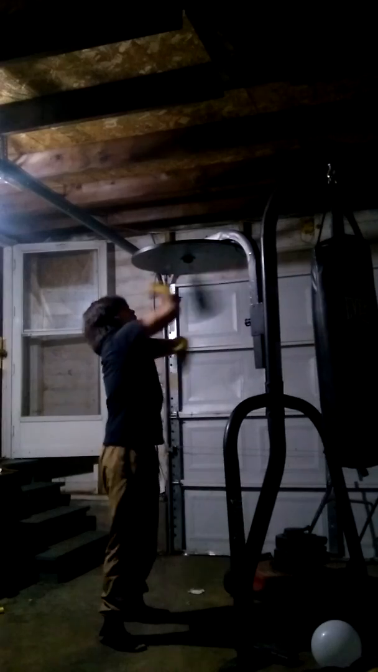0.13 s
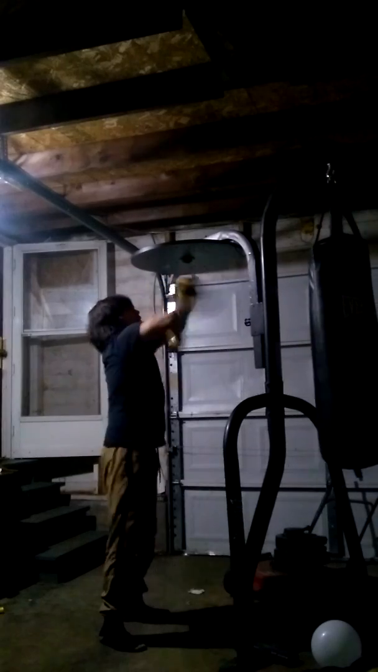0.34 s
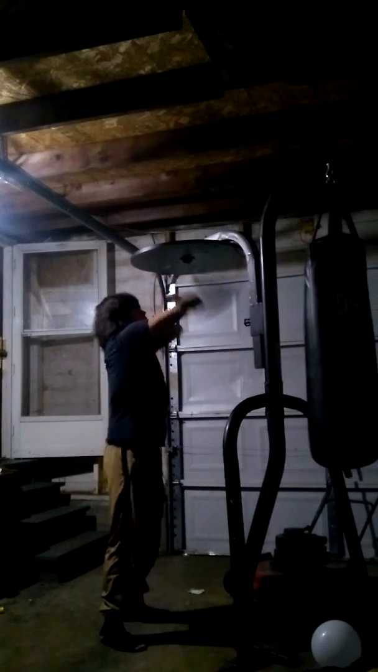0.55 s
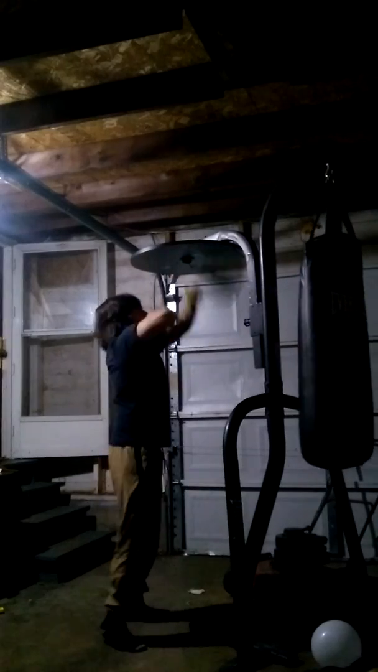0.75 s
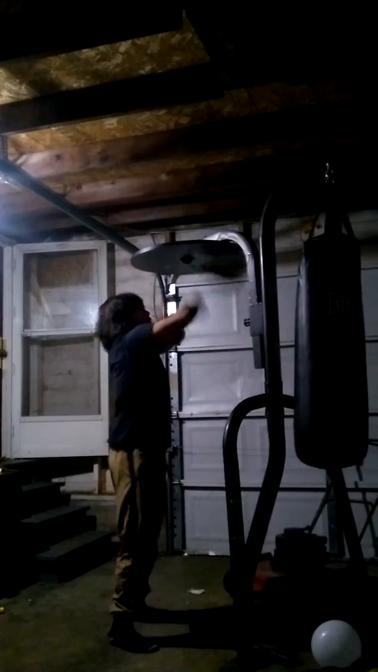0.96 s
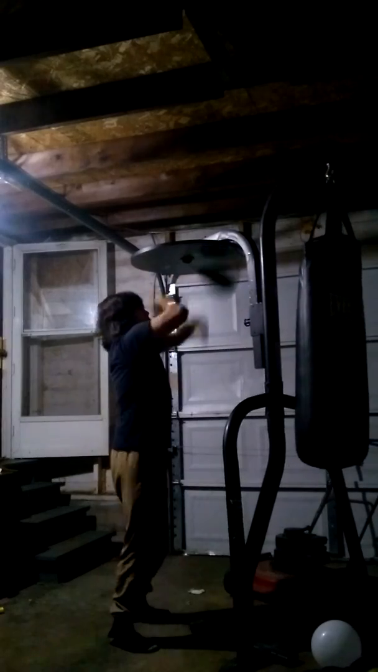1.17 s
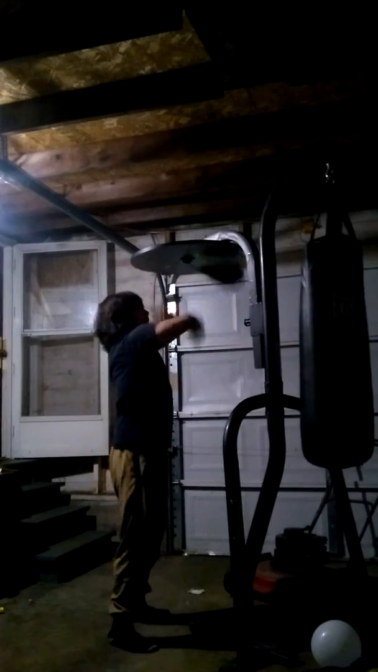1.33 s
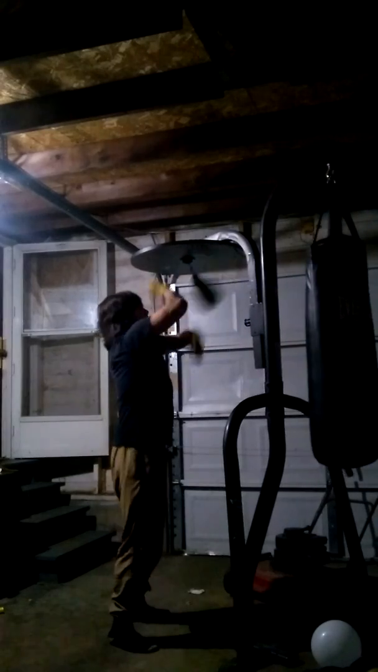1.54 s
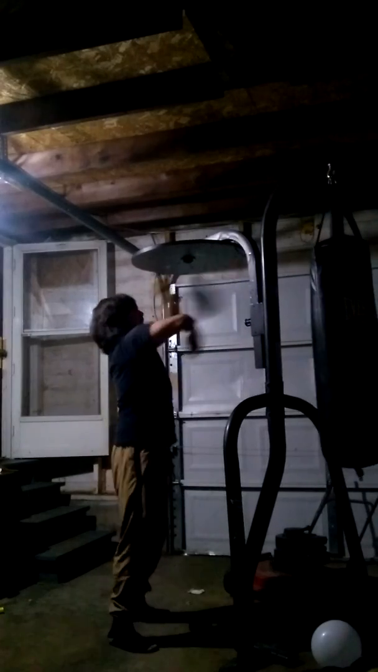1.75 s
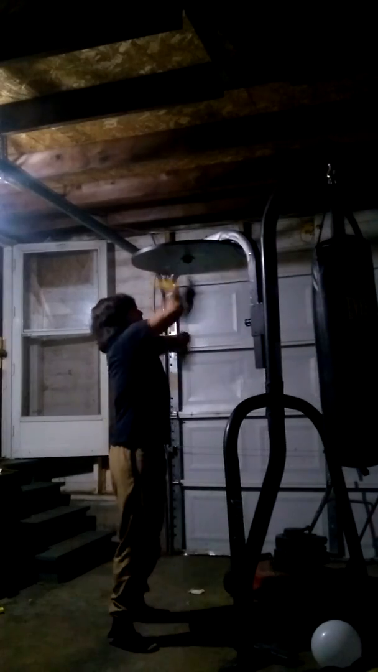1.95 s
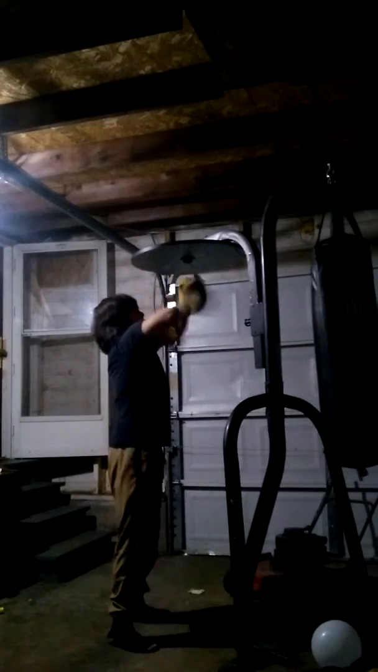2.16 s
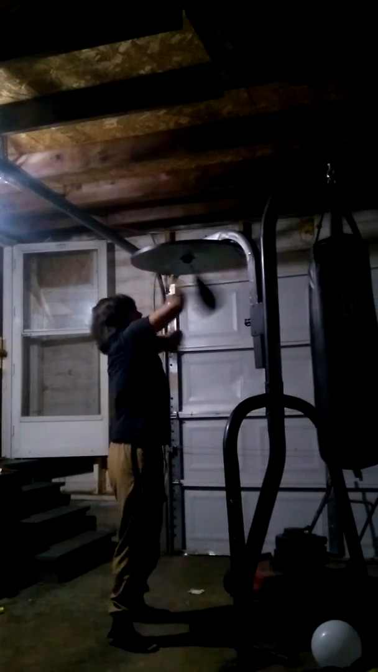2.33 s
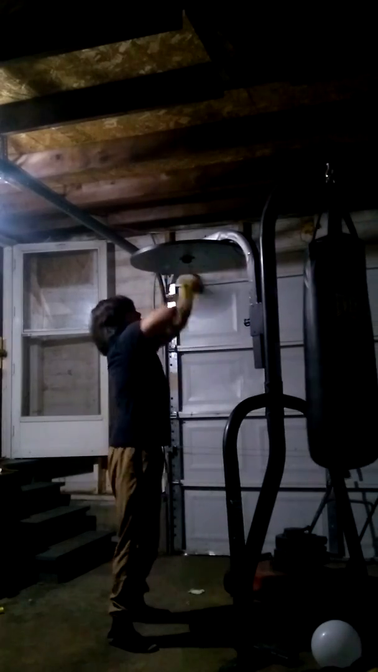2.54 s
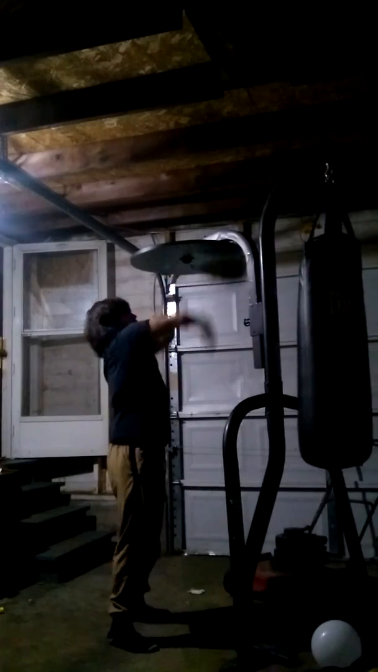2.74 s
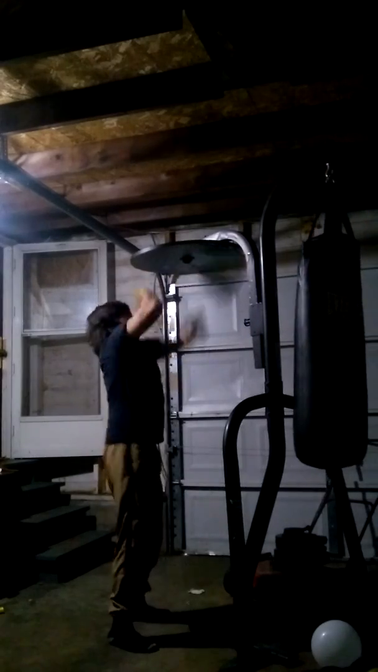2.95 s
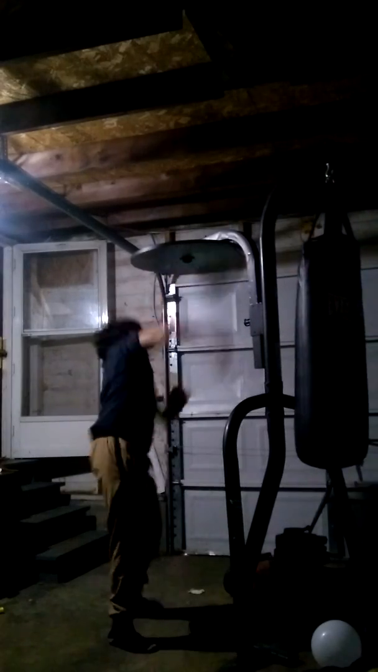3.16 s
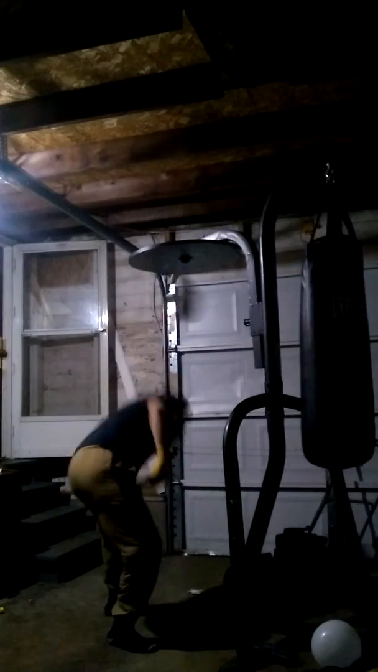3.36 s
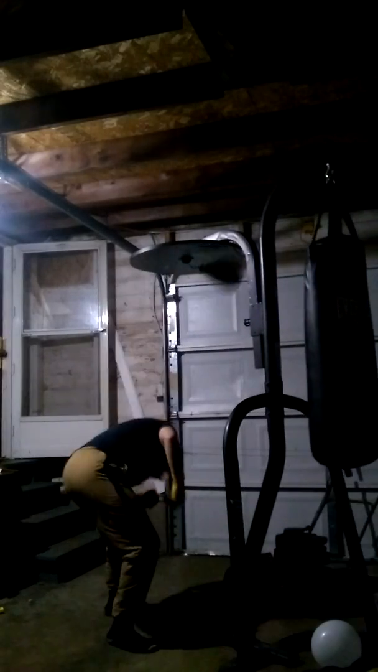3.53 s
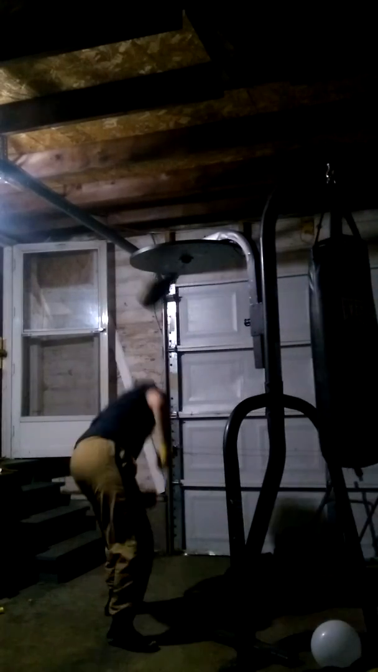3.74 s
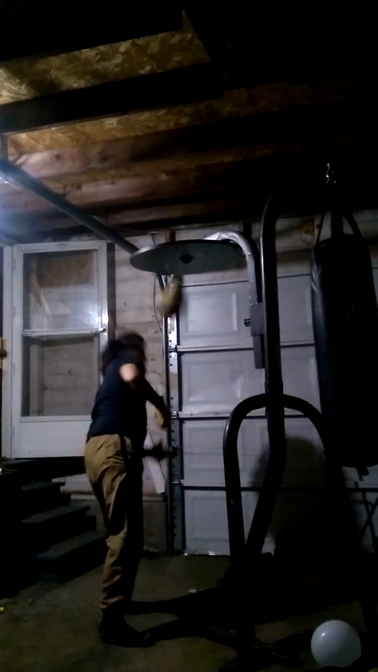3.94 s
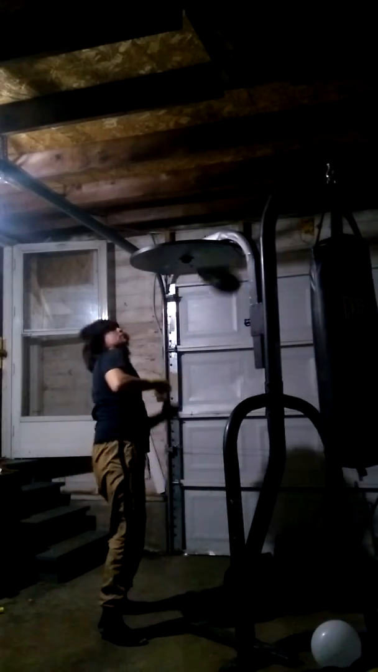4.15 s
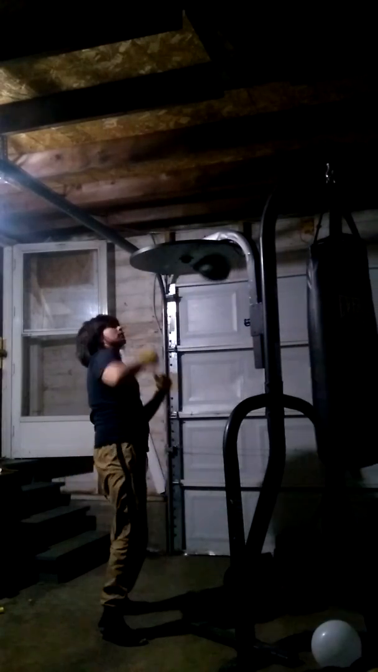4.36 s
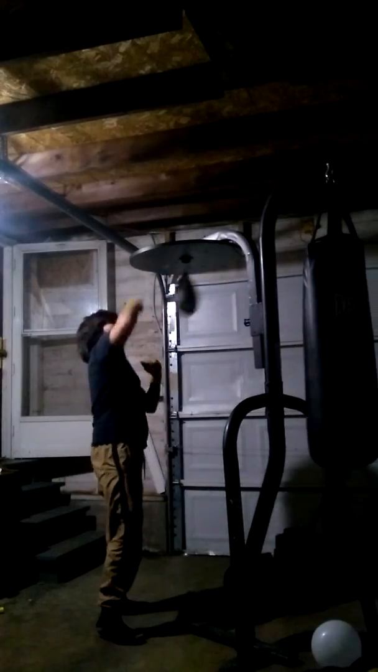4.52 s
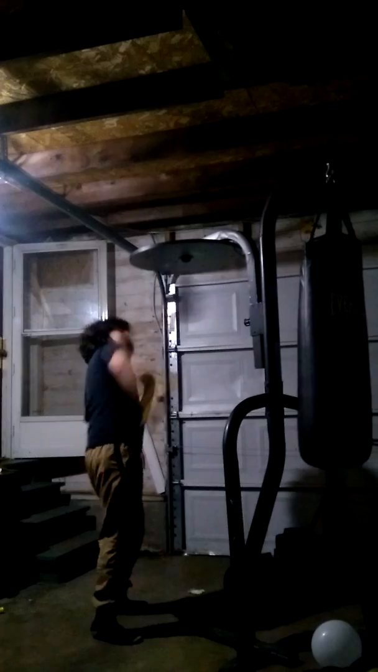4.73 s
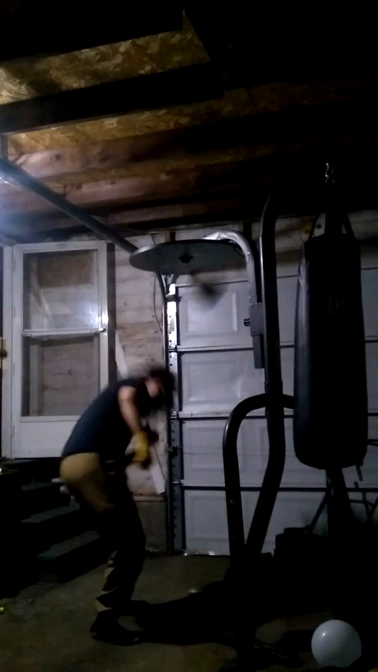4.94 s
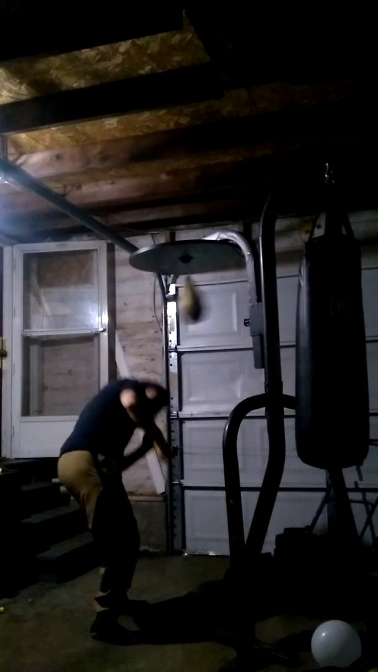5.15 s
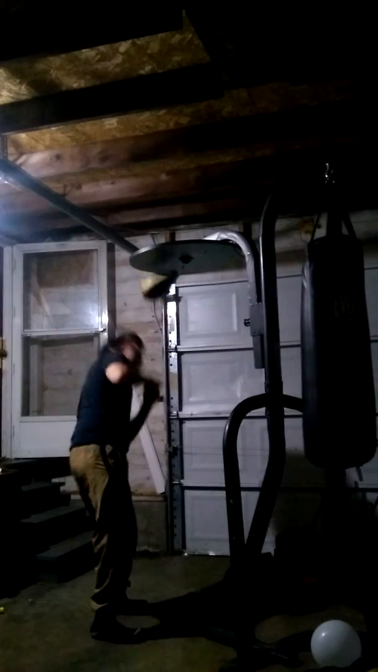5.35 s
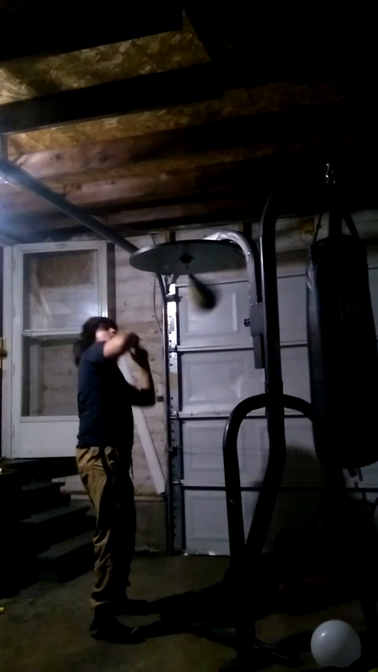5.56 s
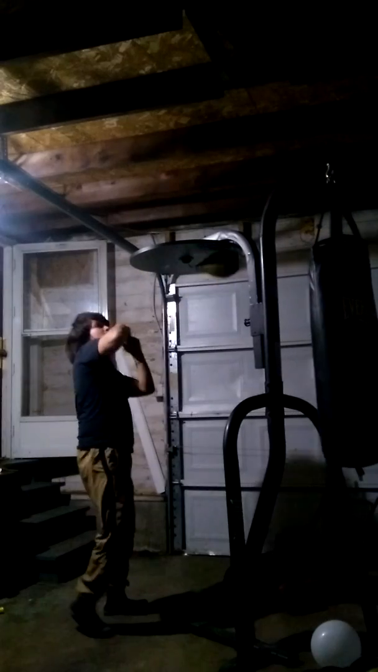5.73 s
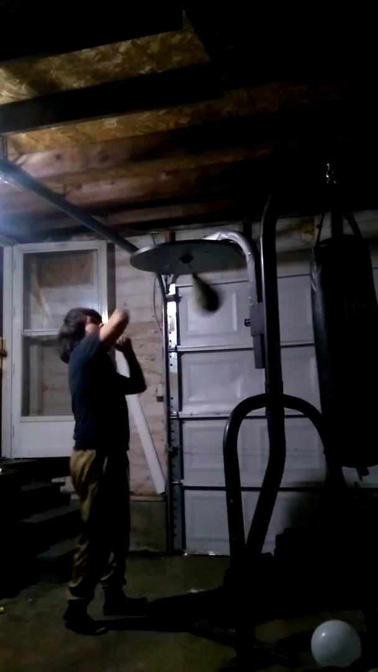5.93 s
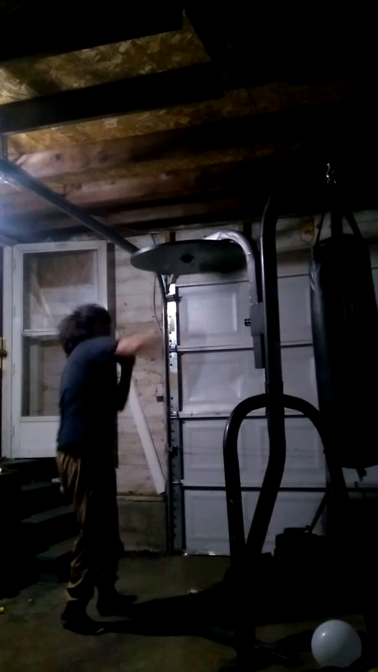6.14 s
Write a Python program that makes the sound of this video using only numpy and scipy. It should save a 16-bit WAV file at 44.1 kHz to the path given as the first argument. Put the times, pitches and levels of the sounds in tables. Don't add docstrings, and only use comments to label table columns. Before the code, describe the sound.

From 0 to about 2.6 seconds, fists thud into a leather speed bag, which slaps the board above roughly six times a second, slightly unevenly. Early hits are duller; from 1 second, leather snaps cut through, the sharpest around 2.1 to 2.4. Each blow gives a short woody thump, a puff of squeezed air, a stand boom and a tiny steel fizz. At 2.6 the bag goes slack, its link jingling, with light ticks and faint frame notes. A shoe scuffs on concrete at 3.0 to 3.2 while clothes rustle softly. Near 3.95 one hard punch and explosive crack echoes, followed by cloth movement and loose ticks around 4.3 to 5.3. At 5.4 a tight flurry ends in another loud crack at 5.47, with a weak tap at 5.6. Small knocks and clicks fade through 6.2. Low rumble, slight hiss and hard garage reverberation persist in close-spaced stereo.

```python
import sys
import numpy as np
from scipy import signal
from scipy.fft import rfft, irfft
from scipy.io import wavfile
from scipy.ndimage import uniform_filter1d

SR = 44100
rng = np.random.default_rng(int(sys.argv[2]) if len(sys.argv) > 2 else 0)


def level_to_linear(level):
    exponent = np.asarray(level, float) / 20
    return 10 ** exponent


def file_out(sig):
    cols = np.atleast_2d(sig).T
    lim = np.clip(cols, -1, 1)
    pcm = np.round(lim * 32767).astype(np.int16)
    wavfile.write(sys.argv[1], SR, pcm)


N = 277380

# start_s, level_db, squareness_db (flat squeezes
# out air, glancing flutters), stand_shake_db
SLAPS = [(0.0004, -29.5, 0.5, -1), (0.0936, -23, 4.5, 2.5), (0.2907, -23.5, 5, 1.5), (0.4659, -18.5, 5, -8),
         (0.632, -19, -4.5, -7), (0.724, -27.5, 11.5, -6), (0.8143, -19.5, 3, -7), (0.9524, -24, -2, -24),
         (1.0062, -19.5, 4.5, 3), (1.1826, -16.5, 4.5, -1), (1.3483, -28, 1, -4), (1.3872, -17.5, 6, -3),
         (1.5821, -23.5, 3, -6), (1.7298, -22.5, -2.5, 4), (1.7596, -21, 2, -10.5), (1.8369, -22.5, 4, -11),
         (1.92, -15, 1.5, 2.5), (2.082, -23.5, 5.5, -1.5), (2.2706, -21.5, 7.5, 2), (2.4359, -23, 10, 4),
         (2.5702, -34.5, 1.5, 0), (2.6166, -44.5, 17.5, -7), (3.9758, -23, 12.5, 1), (4.319, -52, -19, 15),
         (5.4245, -28, 4, 6), (5.4439, -27.5, -0.5, -1), (5.4636, -22, 13, -1)]
# start_s, peak_db
CRACKS = [(0.2957, -24.8), (0.4709, -15), (0.8164, -13), (0.9546, -35.6), (1.0082, -9.5), (1.346, -30),
          (1.3883, -8.5), (1.69, -39), (1.5832, -28), (1.9201, -14.5), (2.0849, -2.7), (2.2734, -9.7),
          (2.4372, -6.5), (2.5701, -34.6), (3.9788, -1.9), (5.4663, -3), (5.6158, -38.1), (6.2092, -40)]
# start_s, level_db, pitch_hz
BELLIES = [
    (3.9726, -8.5, 600),
    (5.4605, -14.5, 800),
]
# start_s, thud_db, knuckle_share_db
PUNCHES = [(0.015, -28.5, 7), (0.204, -22, 7), (0.282, -19.5, 5), (0.393, -17.5, 6), (0.56, -22.5, -15),
           (0.619, -20.5, 7.5), (0.747, -18.5, 4), (0.927, -19.5, -12), (1.101, -21, 0.5),
           (1.297, -16.5, -23), (1.497, -25, 15), (1.678, -16.5, -4.5), (1.867, -20, -1.5),
           (2.028, -16.5, -2), (2.371, -17.5, -8), (3.9277, -11.5, 3), (3.97, -19.5, 11),
           (5.401, -16.5, -1.5), (5.457, -19.5, -1.5), (5.617, -26, 1)]
# start_s, level_db
JINGLES = [
    (2.64, -44.5),
    (3.425, -65),
    (4.924, -49),
    (6.2085, -73),
    (4.3167, -91),
    (4.6213, -64),
]
# start_s, touch_db, swivel_click_db
TICKS = [(2.795, -42.5, -71), (2.8366, -44.5, -72), (2.928, -48.5, -72), (3.1157, -43, -41.5),
         (3.1271, -44.5, -68), (3.234, -50.5, -47.5), (3.4399, -51.5, -52.5), (3.6306, -75, -56),
         (3.705, -69.5, -78), (4.3177, -45.5, -47.5), (4.47, -37.5, -43), (4.5006, -57, -64),
         (4.6213, -42.5, -48), (4.6684, -48.5, -56), (4.9282, -65, -57), (4.9714, -44.5, -62),
         (5.1418, -69, -67), (5.299, -57.5, -84), (5.8185, -48, -64), (5.8386, -39, -65),
         (5.8607, -49, -40), (5.9928, -46.5, -72), (6.173, -53, -68), (6.2096, -47, -48.5)]
# start_s, pitch_hz, level_db
FRAME_NOTES = [(2.628, 1780, -35.5), (2.835, 2120, -40.5), (2.838, 1274, -38), (2.928, 617, -38),
               (3.404, 600, -50), (4.498, 800, -41.5), (4.50, 606, -49), (5.142, 602, -46),
               (5.84, 536, -40), (6.02, 715, -49.5), (6.165, 430, -44.5)]
# start_s, level_db (at the height of the movement)
MOVES = [
    (2.6, -59.5),
    (3.08, -56.5),
    (3.7, -67),
    (4.05, -51),
    (5.1, -65.5),
    (5.601, -52),
    (6.2, -66),
]

# pitch_hz, level_db, t60_s
BOARD = [(86, -8.5, 0.15), (113.6, -6, 0.099), (167, -4, 0.064), (255.6, -5.5, 0.057), (323.7, -6, 0.085),
         (444, 0.5, 0.041), (576, -0.5, 0.05), (634, 1, 0.025), (800, 1, 0.026), (960, 4.5, 0.014),
         (1190, -1, 0.026), (1410, -23.5, .025), (1760, -29, .025)]
# pitch_hz, level_db, t60_s
BAG_AIR = [(262, -2.5, 0.027), (336.6, 1, 0.058), (419.7, 2, 0.023), (600, 0.5, 0.025), (858, -1, 0.012),
           (1181, -11, 0.0069)]

# pitch_hz, level_db
LEATHER = [(100, -13.5), (400, -12.5), (1000, 5), (2000, 8.5), (3500, 3.5), (6000, -14), (10000, -13.5),
           (16000, -13)]
# pitch_hz, level_db
SHARP_AIR = [(200, -29), (1000, 8), (3000, 13), (6000, 3), (10000, -2), (16000, -5)]
# pitch_hz, level_db
SEAM = [(200, -14), (1000, -4), (3000, -1), (6000, -2), (10000, -3), (16000, -4)]
# pitch_hz, level_db
LINK = [(1000, -23.5), (3000, -2.5), (6000, 0), (9000, -1.5), (13000, 0), (16000, -5)]
# pitch_hz, level_db
CLOTH = [(50, -22.5), (150, -2), (500, 3), (1200, 4), (2000, -8), (4000, -13.5), (8000, -21.5),
         (16000, -26.5)]
# pitch_hz, level_db
RUMBLE = [(20, -9), (60, 3.5), (120, 0), (250, -3), (600, -26.5), (2000, -30)]

# delay_s, level_db
ECHOES = [
    (.0082, -14),
    (.0145, -15),
    (.0215, -18),
]
# pitch_hz, t60_s
GARAGE_T60 = [(60, 0.35), (150, 0.73), (400, 0.44), (1000, 0.64), (3000, 0.59), (7000, 0.49), (15000, 0.5)]
# pitch_hz, likeness (0 to 1)
PORT_LIKENESS = [(30, 1), (120, 0.98), (300, 0.98), (700, 0.84), (1500, 0), (3000, 0.12)]
# pitch_hz, level_db
MICROPHONE = [(20, -26), (60, 2.5), (85, 8), (300, 6), (1000, -1), (4000, 0), (6000, -2), (8300, 5.5),
              (9200, 3), (14300, -3.5), (15000, -8.5), (15500, -32), (22000, -45)]
# pitch_hz, level_db
RIGHT_MINUS_LEFT = [(60, 4.5), (200, -0.5), (700, 2.5), (1300, 4), (2450, 1.5), (3500, -1), (4900, 5.5),
                    (7000, 4.5), (12000, 2.5)]


def rms_one(x):
    return x / np.sqrt(np.mean(x ** 2) + 1e-20)


def at_hz(points, hz):
    table = np.array(points)
    return np.interp(np.log(hz + 1), np.log(table[:, 0]), table[:, 1])


def colour(x, spectrum):
    log_gain = at_hz(spectrum, np.linspace(0, SR / 2, 4097)) * np.log(10) / 20
    cepstrum = irfft(log_gain)
    cepstrum[1:4096] *= 2
    cepstrum[4097:] = 0
    kernel = irfft(np.exp(rfft(cepstrum)))[:4096]
    return signal.fftconvolve(np.atleast_2d(x), kernel[None])[:, :N].squeeze()


def later(x, count):
    return np.pad(x, [(0, 0)] * (x.ndim - 1) + [(count, 0)])[..., :N]


def clicks(times, db, shift_s=0.):
    out = np.full(N, 1e-18)
    places = ((times + shift_s) * SR).astype(int)
    out[np.clip(places, 0, N - 1)] = level_to_linear(db)
    return out


def burst(strikes, rise_s, fall_s, count=4):
    at = np.flatnonzero(strikes > 1e-9)
    t = np.arange(4096) / SR
    shape = (1 - np.exp(-t / rise_s)) * np.exp(-t / fall_s)
    runs = shape * rng.standard_normal((len(at), len(t)))
    for _ in range(count):
        runs = irfft(np.exp(1j * np.angle(rfft(runs))))
        runs = shape * runs / np.sqrt(uniform_filter1d(runs ** 2, size=41) + 1e-12)
    out = np.zeros(N + len(t))
    for i, run in zip(at, runs):
        out[i:i + len(t)] += strikes[i] * run
    return out[:N]


def ring(force, hz, t60):
    r = level_to_linear(-60 / (t60 * SR))
    w = 2 * np.pi * hz / SR
    return signal.lfilter([0, np.sin(w)], [1, -2 * r * np.cos(w), r * r], force)


def body(force, modes):
    return sum(level_to_linear(db) * ring(force, hz, t60) * (-1) ** k for k, (hz, db, t60) in enumerate(modes))


def slaps():
    s, thump_db, square_db, shake_db = np.transpose(SLAPS)
    hiss_db = thump_db + square_db
    boom_db = thump_db - 14 + shake_db
    flutter_db = thump_db - 4 - 0.99 * square_db
    thump = body(burst(clicks(s, thump_db - 21, shift_s=-0.00412), rise_s=0.0012, fall_s=0.0052), BOARD[3:])
    boom = body(burst(clicks(s, boom_db - 10.5), rise_s=0.0017, fall_s=0.0084), BOARD[:3])
    flutter = colour(burst(clicks(s, flutter_db + 6, shift_s=-0.0012), rise_s=0.0041, fall_s=0.01), LEATHER)
    hiss = colour(burst(clicks(s, hiss_db - 3), rise_s=0.0023, fall_s=0.0052), SHARP_AIR)
    return thump + boom + flutter + hiss


def cracks():
    s, db = np.transpose(CRACKS)
    spike = clicks(s, db + 9)
    pop = .19 * ring(later(spike, count=4), 900, t60=.003)
    crackle = .17 * burst(spike, rise_s=.0001, fall_s=.0005)
    return colour(crackle - spike, SEAM) + pop


def bellies():
    return sum(ring(clicks(np.array([s]), db), hz, t60=0.0099) for s, db, hz in BELLIES)


def punches():
    s, thud_db, knuckle_db = np.transpose(PUNCHES)
    smack_db = thud_db - 13 + knuckle_db
    boom_db = thud_db - 24
    contact = clicks(s, thud_db - 23)
    push = signal.lfilter([1], [1, -.8], contact) + .5 * burst(contact, rise_s=0.00048, fall_s=.006)
    boom = body(burst(clicks(s, boom_db - 11), rise_s=0.0007, fall_s=0.015), BOARD[:3])
    smack = colour(burst(clicks(s, smack_db + 5.0), rise_s=0.0025, fall_s=0.0059), LEATHER)
    return body(push, BAG_AIR) + boom + smack


def jingles():
    from_blows = [(s, db - 27 + knuckle_db / 2) for s, db, knuckle_db in PUNCHES]
    s, db = np.transpose(JINGLES + from_blows)
    return colour(burst(clicks(s, db), rise_s=0.0019, fall_s=0.0089), LINK)


def ticks():
    s, knock_db, click_db = np.transpose(TICKS)
    brush_db = knock_db - 0.5
    click = colour(burst(clicks(s, click_db + 5.5), rise_s=0.0011, fall_s=0.0025), SHARP_AIR)
    brush = colour(burst(clicks(s, brush_db + 3), rise_s=0.0031, fall_s=0.0071), LEATHER)
    knock = body(burst(clicks(s, knock_db - 24), rise_s=.006, fall_s=.015), BOARD[4:])
    frame = sum(ring(clicks(np.array([at]), db), hz, t60=0.057) for at, hz, db in FRAME_NOTES)
    return click + brush + knock + frame


def scuff(width_hz=110.0):
    start_s, attack_s, hold_s, release_s = 2.98, 0.047, 0.16, 0.05
    start_hz, end_hz, glide_s = 874, 1547, 0.25
    level_db, sag_db = -42.5, 3
    t = np.maximum(np.arange(N) / SR - start_s, 0)
    hz = end_hz + (start_hz - end_hz) * np.exp(-t / glide_s)
    low_pass = signal.butter(2, width_hz, fs=SR, output="sos")
    slow = signal.sosfilt(low_pass, rng.standard_normal((2, N)))
    weight = np.interp(t, np.cumsum([0, attack_s, hold_s, release_s]), [0, 1, 1, 0]) ** 2
    turn = 2 * np.pi * np.cumsum(hz) / SR
    band = rms_one(slow[0] * np.cos(turn) + slow[1] * np.sin(turn))
    return band * weight * level_to_linear(level_db - 5.5 - sag_db * t / hold_s)


def rustle():
    rise_db_per_s, fall_db_per_s = 55.5, 33.5
    s, db = np.transpose(MOVES)[:, :, None]
    since = np.arange(N) / SR - s
    slope = np.where(since < 0, -rise_db_per_s, fall_db_per_s)
    level = level_to_linear(db - slope * since).max(axis=0)
    return rms_one(colour(rng.standard_normal(N), CLOTH)) * level


def background():
    return level_to_linear(-68) * rms_one(colour(rng.standard_normal(N), RUMBLE))


def reflections(build_s=0.0068, early_db=8.0, early_s=0.081):
    size = SR * 3 // 4
    t, hz = np.arange(size) / SR, np.fft.rfftfreq(size, 1 / SR)
    white = rfft(rng.standard_normal((2, size)))
    alike = np.clip(at_hz(PORT_LIKENESS, hz), 0, 1)
    common = np.sqrt(1 + alike) * white[0]
    apart = np.sqrt(1 - alike) * white[1]
    ports = np.array([common + apart, common - apart])
    tail = np.zeros((2, size))
    centres = np.geomspace(40, 20000, 10)
    for k, centre in enumerate(centres):
        share = np.interp(np.log(hz + 1), np.log(centres), np.arange(10) == k)
        tail += irfft(ports * share, size) * level_to_linear(-60 * t / at_hz(GARAGE_T60, centre))
    tail *= (1 - np.exp(-t / build_s)) * level_to_linear(early_db * np.exp(-t / early_s))
    return tail / np.sqrt(np.sum(tail ** 2) / 2)


def garage(x, count=6):
    turn = np.arange(N) / SR / .09 % count
    out = 0
    for k in range(count):
        apart = np.abs((turn - k + count / 2) % count - count / 2)
        share = np.cos(np.pi / 2 * np.minimum(apart, 1))
        out = out + signal.fftconvolve((share * x)[None], reflections())[:, :N]
    return out


def scene():
    crack = cracks() + bellies()
    rest = slaps() + punches() + jingles() + ticks() + scuff() + rustle() + background()
    direct = crack + level_to_linear(-8.5) * rest
    echoes = sum(level_to_linear(db) * later(direct, count=int(s * SR)) for s, db in ECHOES)
    ports = np.array([direct + later(echoes, count=9), later(direct, count=4) + echoes])
    near, far = garage(level_to_linear(-12.0) * crack + level_to_linear(1.5) * rest)
    return ports + [near, later(far, count=3)]


def roll_off(x):
    return signal.sosfilt(signal.butter(12, 16380, fs=SR, output="sos"), x)


def record(dry):
    ports = dry + level_to_linear(-79.5) * rng.standard_normal((2, N))
    dull = signal.butter(2, 8200, fs=SR)
    crossed = signal.filtfilt(*dull, later(ports[::-1], count=18))
    left, right = colour(ports - .97 * crossed, MICROPHONE)
    side_gain = level_to_linear(at_hz(RIGHT_MINUS_LEFT, np.fft.rfftfreq(N, 1 / SR)))
    right = irfft(rfft(right) * side_gain, N)
    return roll_off(np.clip([left, right], -1, 1))


dry = scene()
out = record(dry)
file_out(out)
```